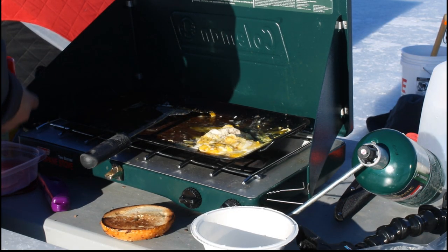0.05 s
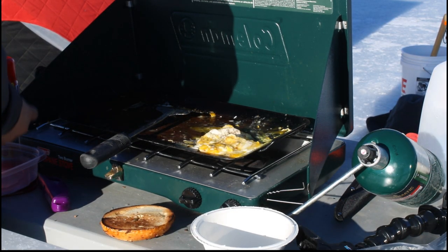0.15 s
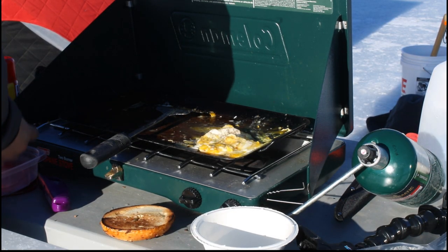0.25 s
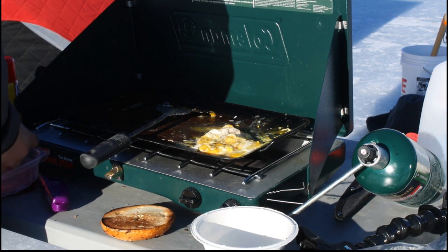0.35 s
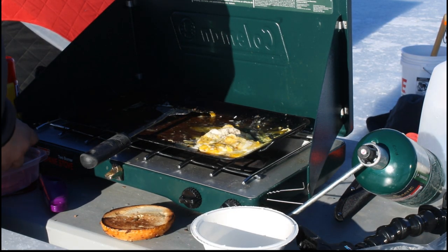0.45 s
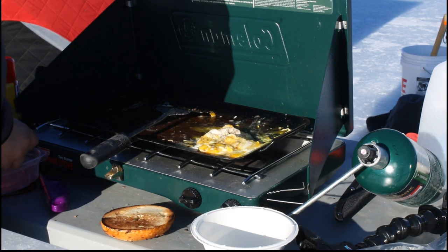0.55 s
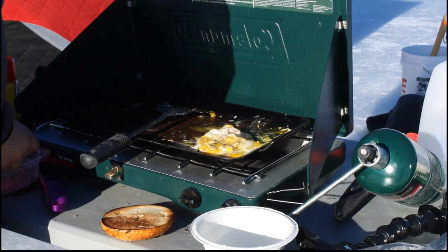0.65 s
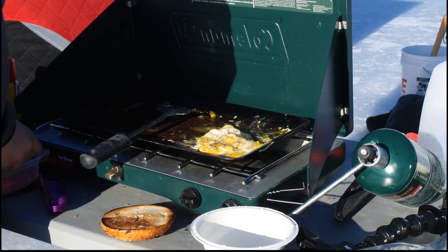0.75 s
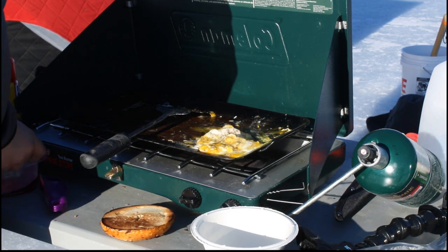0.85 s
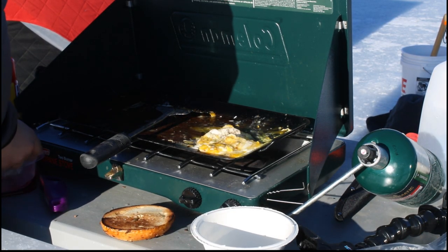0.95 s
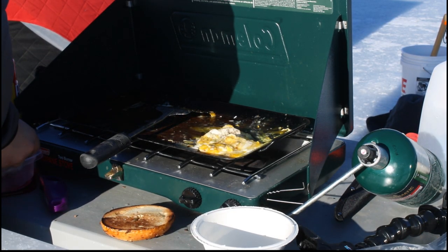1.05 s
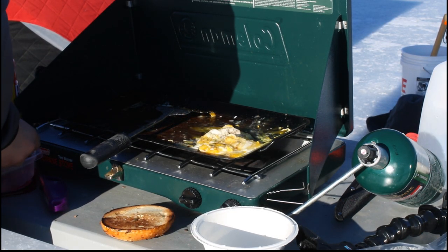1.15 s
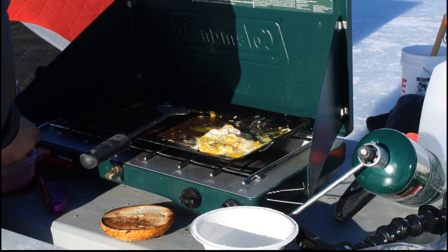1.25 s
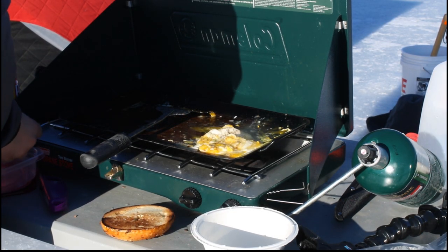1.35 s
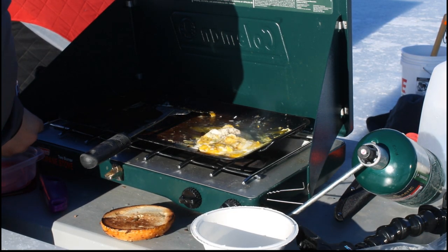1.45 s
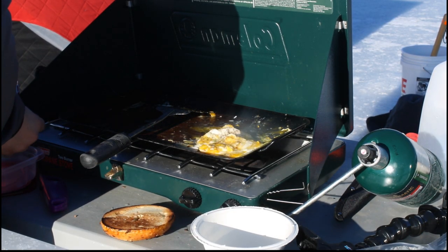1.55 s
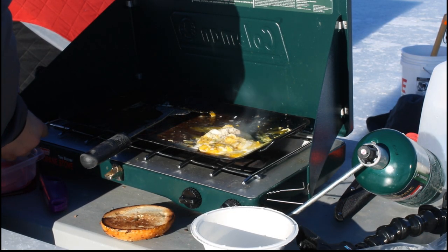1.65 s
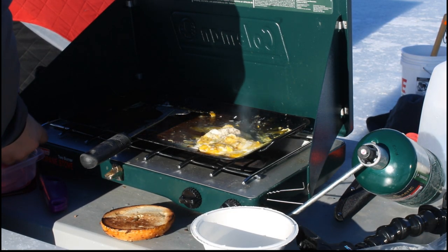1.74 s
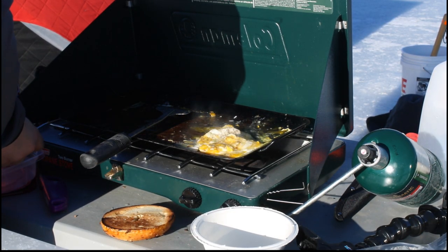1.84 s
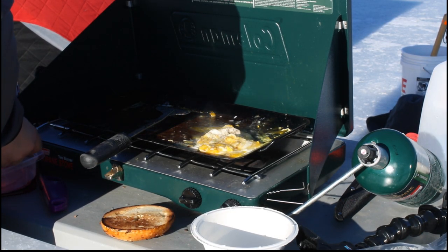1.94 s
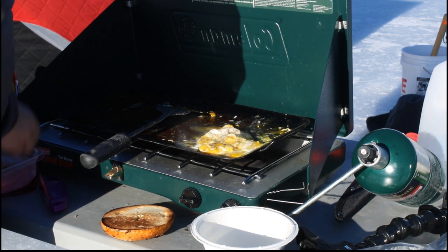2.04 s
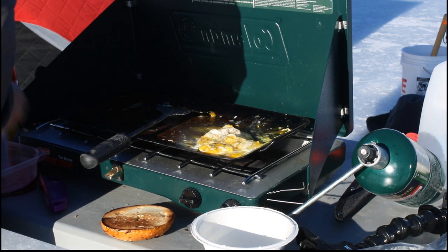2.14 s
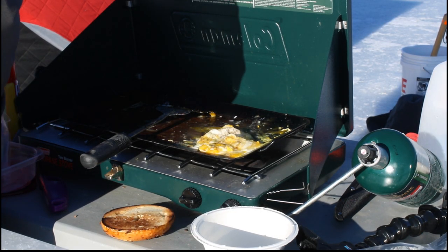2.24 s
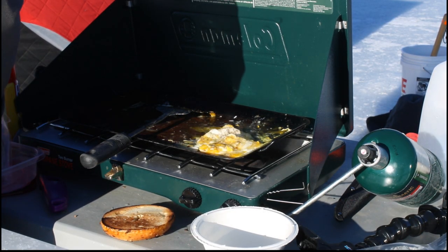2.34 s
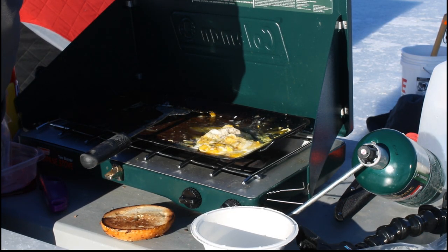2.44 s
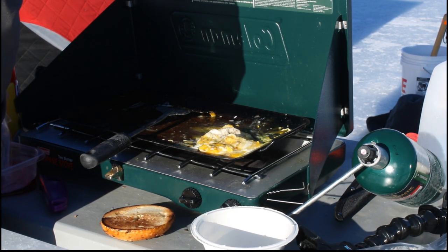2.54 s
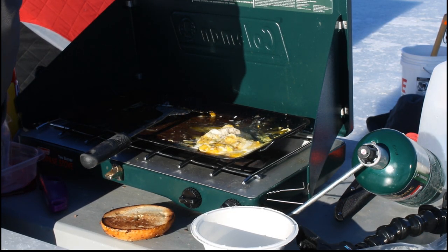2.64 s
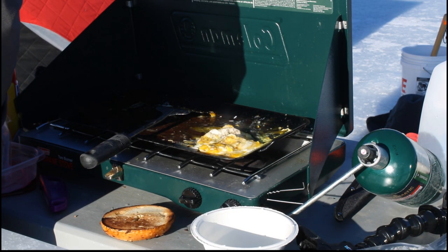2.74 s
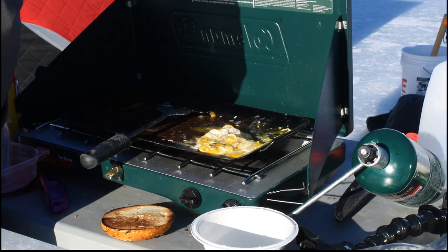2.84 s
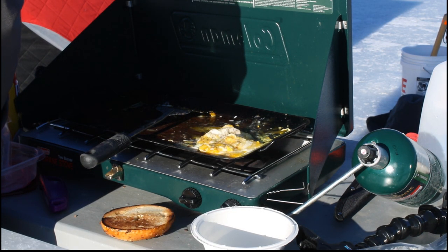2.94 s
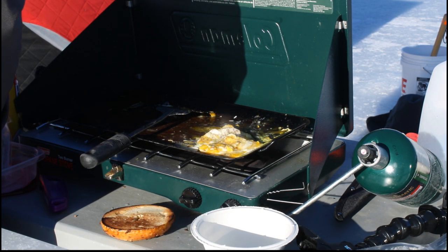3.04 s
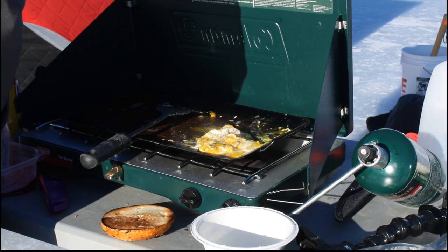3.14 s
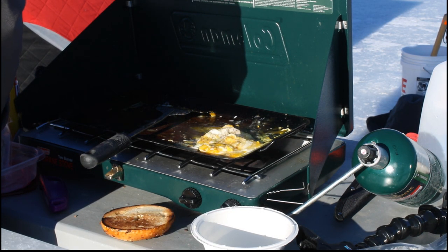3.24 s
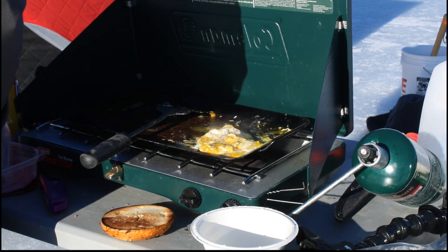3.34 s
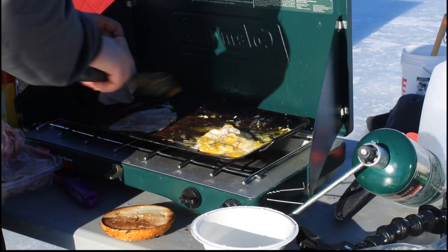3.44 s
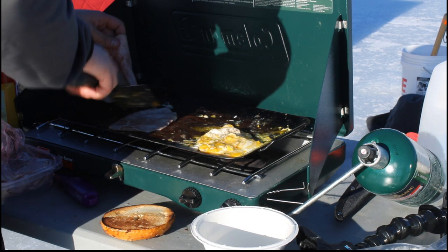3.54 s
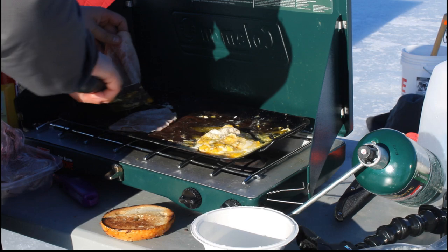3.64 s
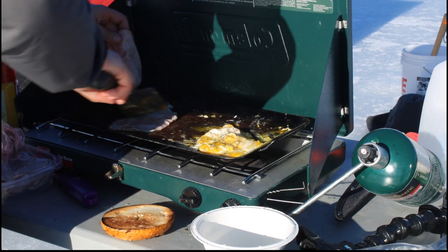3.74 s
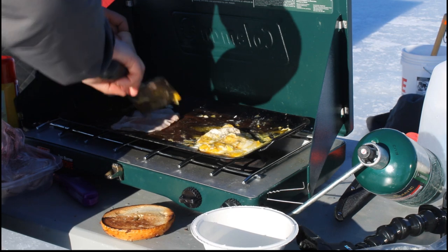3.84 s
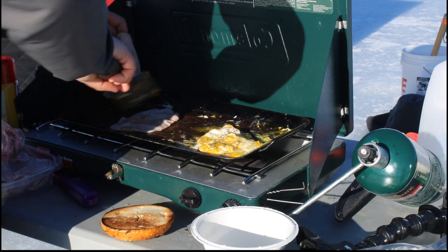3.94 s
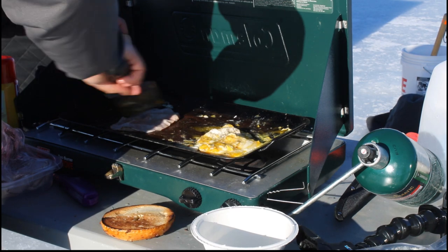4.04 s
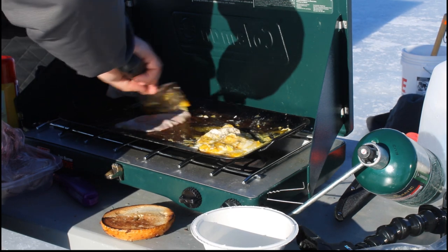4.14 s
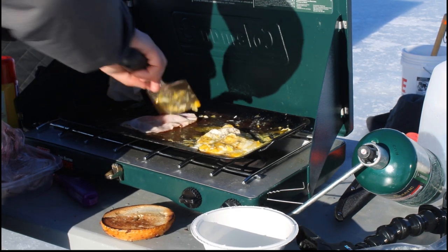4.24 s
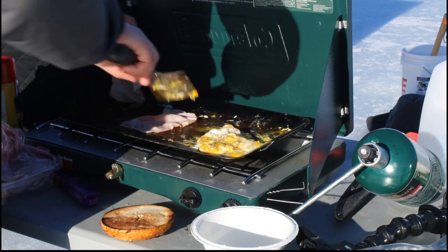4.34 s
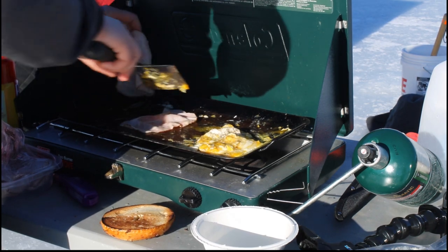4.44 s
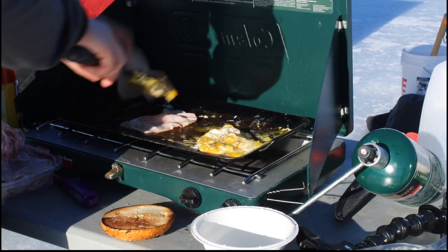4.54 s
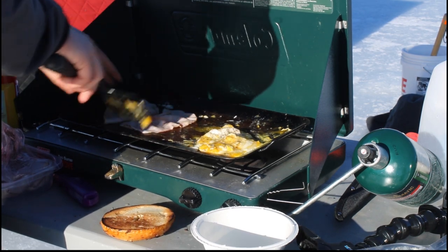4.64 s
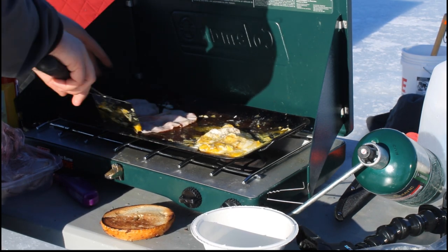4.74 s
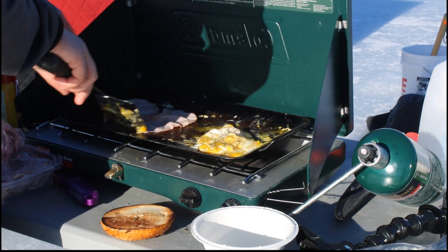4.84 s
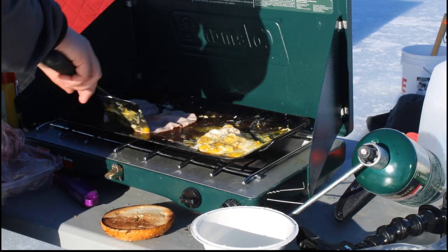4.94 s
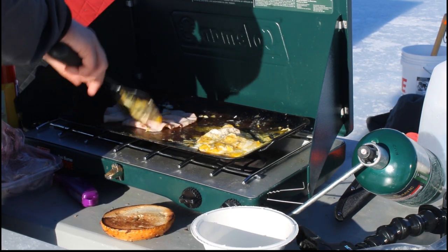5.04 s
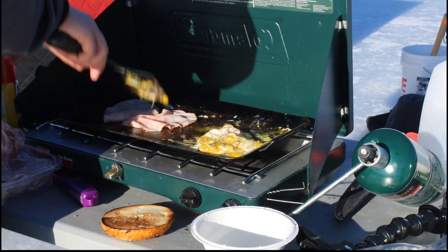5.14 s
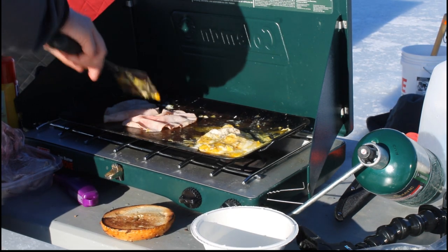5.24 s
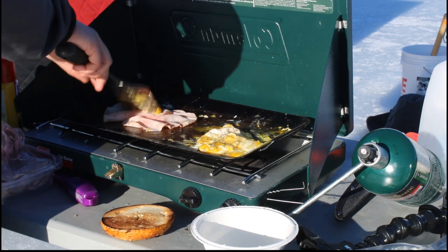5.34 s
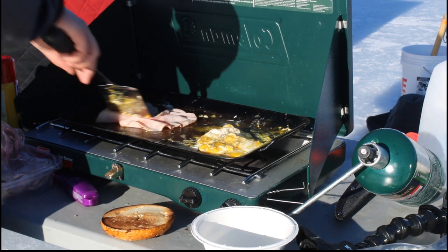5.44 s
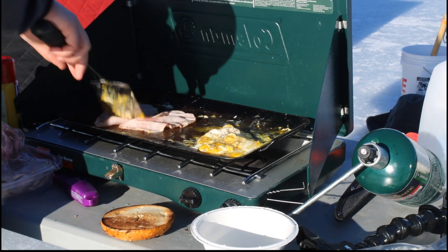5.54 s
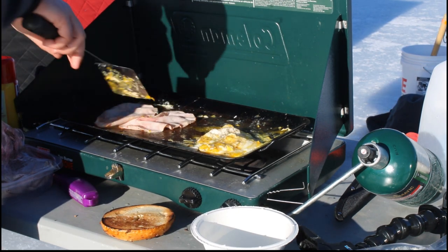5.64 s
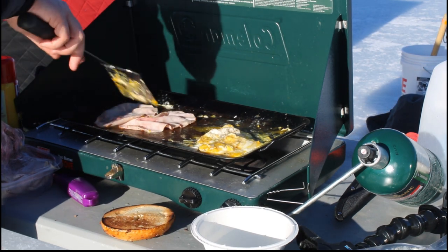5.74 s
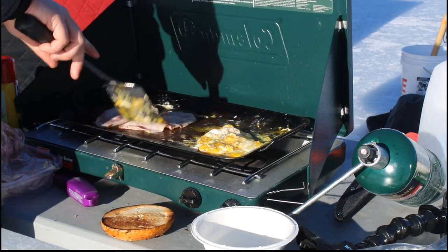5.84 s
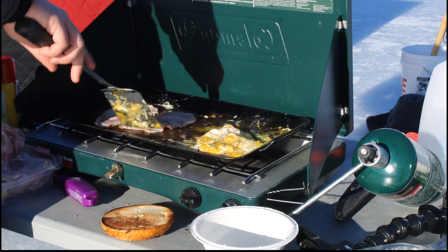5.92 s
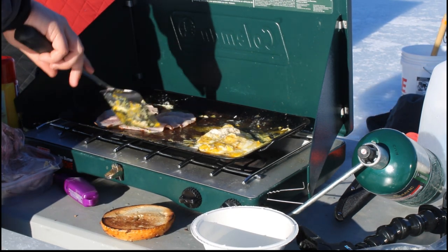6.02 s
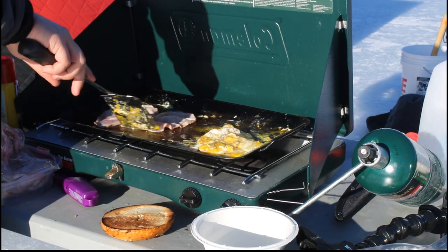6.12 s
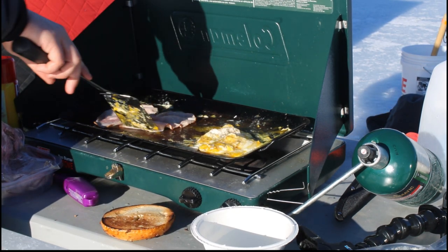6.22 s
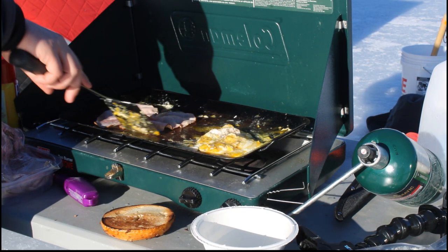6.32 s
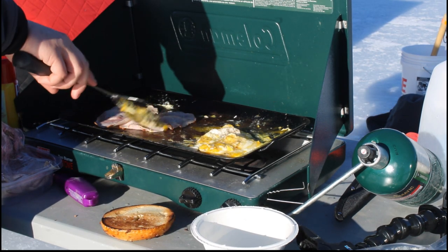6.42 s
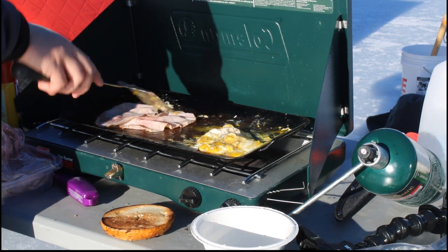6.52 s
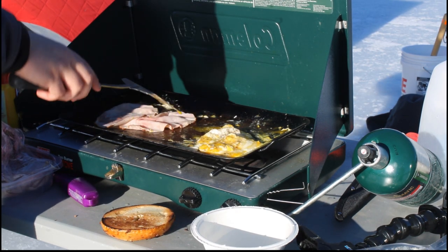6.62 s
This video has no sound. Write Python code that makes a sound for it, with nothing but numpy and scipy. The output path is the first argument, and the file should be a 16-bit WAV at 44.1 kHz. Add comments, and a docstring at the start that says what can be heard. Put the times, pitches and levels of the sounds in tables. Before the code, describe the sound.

Gas burner hiss and whistle with sparse egg crackle, then the flame drops, ham sizzles denser, a spatula knocks and scrapes, wind buffets the microphone.

```python
"""Egg and ham fry on a camp stove griddle, outdoors and close to one microphone: filtered noise and popping bubbles
fizz, drops of fat spit, and the sizzle grows once the ham is laid on and pressed.
The gas burner under it hisses, whistles and rumbles as shaped noise, until it is turned down halfway.
Gusts buffet the microphone in short low bursts that overload it and make its limiter duck.
Damped modes make dry knocks and the hard edge of two overloading wind thumps; a steel spatula scrapes and rings."""
import sys
import numpy as np
from scipy import signal
from scipy.fft import rfft, irfft, next_fast_len
from scipy.io import wavfile
from scipy.ndimage import uniform_filter1d, map_coordinates

SR = 44100
rng = np.random.default_rng(int(sys.argv[2]) if len(sys.argv) > 2 else 0)


def store_wav(level_fs):
    """Save 16-bit WAV to argv[1]."""
    pcm = np.round(np.clip(np.atleast_2d(level_fs), -1, 1) * 32767)
    wavfile.write(sys.argv[1], SR, pcm.T.astype(np.int16))


N = 294588

# Resonances of the burner tube: (frequency [Hz], width [Hz], level [dB])
TUBE_MODES = [(600, 42, 1), (884, 42, 4.5), (1282, 105, 6.5), (1855, 39, 0), (2820, 310, -9),
              (3864, 224, 1), (4500, 360, -1.5), (5740, 520, -4), (6870, 330, -7), (8100, 660, -11),
              (10780, 540, -11), (13800, 370, -9)]
# Spectrum of the flame's rumble: (frequency [Hz], density [dB per Hz])
FLAME_SPECTRUM = [(25, -3.5), (90, 2.5), (200, -7.5), (600, -15), (760, -23.5), (1400, -68)]
# The jet's breathy whistles at full gas: (time [s], low whistle [dB], middle whistle [dB])
WHISTLE_LEVELS = [(0, -45, -53), (.76, -49, -48), (.84, -52, -44.5), (1.25, -52, -39.5), (1.5, -46, -46.5),
                  (2.52, -44.5, -45.5), (2.9, -50, -54), (3.301, -43.5, -45)]
# Resonances that make the low, middle and top whistle: (frequency [Hz], width [Hz])
WHISTLE_MODES = [(4930, 110), (5240, 65), (8300, 220)]
# The gas runs evenly, then is turned down at GAS_DOWN_S
GAS_DB, GAS_LOW_DB, GAS_DOWN_S, GAS_FADE_DB_PER_S = -0.5, -10.5, 3.39, 300

# Spectrum of the light breeze on the microphone: (frequency [Hz], density [dB per Hz])
BREEZE_SPECTRUM = [(20, -4), (65, 2), (130, -5), (250, -7), (650, -30), (1200, -34), (4000, -68)]
# Gusts on the microphone: (time of the crest [s], rms level [dB], build time [s])
GUSTS = [(.158, -6, .014), (.225, -14, 0.045), (.622, -15, 0.021), (2.63, -22.5, 0.037),
         (2.715, -16.5, 0.025), (3.467, -15.5, 0.016), (3.508, -15, 0.024), (3.61, -17.5, 0.011),
         (3.645, -21, 0.017), (3.695, -19, 0.016), (3.777, -25, 0.023), (4.015, -14.5, 0.044),
         (4.27, -31.5, 0.36), (4.381, -16.5, 0.011), (4.419, -7.5, 0.011), (4.453, 1.5, 0.018),
         (5.175, -14.5, 0.014), (5.222, -20, 0.021), (5.39, -22.5, 0.02), (5.512, -14.5, 0.01),
         (5.595, -15.5, 0.039), (5.737, -14, 0.013), (5.79, -14, 0.012), (5.858, -16.5, 0.011),
         (6.037, -14, .024), (6.11, -15.5, 0.023), (6.263, -13.5, 0.013), (6.405, -17, 0.023),
         (6.65, -22, 0.055)]
GUST_DIE_RATIO = 1.22  # a gust dies away more slowly than it builds
# Spectrum of a gust: (multiple of the eddy rate [ratio], density [dB per Hz])
EDDY_SPECTRUM = [(.1, -7), (.3, -1), (.7, 3), (1.3, -1), (2.1, -9), (3.5, -23.5), (6, -36.5), (14, -71)]
# The strongest eddies thump the diaphragm: (time [s], peak level [dB], frequency [Hz])
THUMPS = [(.0605, -5.5, 158), (0.1474, -2, 426), (0.1584, -2, 190), (0.229, 5, 248), (.605, 0.5, 200),
          (0.6115, -7, 215.3), (2.618, -7, 98.5), (2.684, -3.5, 186.7), (3.5114, -6.5, 400),
          (3.5221, 1, 395), (4.392, -10, 440), (4.3979, -3, 239), (4.4151, -2, 300), (4.433, -5, 454),
          (5.1785, -10, 140), (5.2111, -11.5, 285), (5.606, -5.5, 183), (5.748, -5.5, 350),
          (5.787, -5.5, 350), (6.106, -6, 332), (6.3969, -5, 375), (6.4273, -11.5, 188), (6.488, -6.5, 308)]

# Flare-ups as moisture meets hot fat: (time of the crest [s], level [dB], rise [s], fall [s])
FLARES = [(0.019, -36.5, 0.044, 0.06), (0.428, -41.5, 0.24, 0.13), (.9, -44.5, 0.13, 0.25),
          (1.66, -40, .02, 0.07), (2.01, -37, 0.049, 0.16), (3.479, -40, 0.065, 0.15),
          (3.69, -37.5, 0.016, 0.022), (4.059, -34.5, 0.012, 0.027), (4.3, -37.5, 0.1, 0.36),
          (4.63, -34, 0.015, 0.11), (4.98, -29, 0.25, 0.31), (5.59, -28.5, 0.073, 0.092),
          (5.73, -32, 0.061, 0.051), (6.06, -35.5, 0.15, 0.11), (6.5, -33, 1, 1)]
SIMMER_DB = -48  # the steady simmer under the flare-ups
# Colour of the egg's sizzle: (frequency [Hz], density [dB per Hz])
EGG_SPECTRUM = [(500, -5), (1600, 2), (2900, 1.5), (5200, -8), (6800, -2), (8300, -12), (10500, -14),
                (15000, -50)]
# Colour of the fresh ham's sizzle: (frequency [Hz], density [dB per Hz])
FRESH_HAM_SPECTRUM = [(400, -23), (1500, -6.5), (3500, -9), (5300, -8), (6000, -6.5), (7900, 1.5),
                      (9500, -7.5), (12000, -16.5), (15000, -29)]
# Colour of the pressed ham's sizzle: (frequency [Hz], density [dB per Hz])
PRESSED_HAM_SPECTRUM = [(400, -51), (1500, -15.5), (3300, -17.5), (5200, -5), (6800, -1), (8200, -5.5),
                        (9500, -9.5), (12000, -24), (15000, -38)]

# The loudest bursting drops of fat: (time [s], peak level [dB])
LOUD_SPITS = [(0.0468, -14.5), (0.0672, -14), (0.1027, -14.5), (0.1268, -12.5), (0.4309, -16),
              (0.4700, -16), (0.597, -14), (0.8599, -16), (0.9368, -17), (1.0375, -15), (1.177, -17.5),
              (1.6384, -16), (1.6892, -21.5), (1.7599, -12), (1.8682, -14.5), (1.9022, -22), (1.935, -9),
              (1.968, -18), (2.0143, -14.5), (2.1101, -16), (2.9938, -19), (4.2702, -16.5), (4.6079, -13.5),
              (5.4276, -20.5), (6.6144, -11)]
# Colour of a bursting drop, before its own pitch shift: (frequency [Hz], density [dB per Hz])
SPIT_SPECTRUM = [(600, -3.5), (1600, -3), (3300, -3), (5800, 1.5), (8000, 7.5), (10500, -9), (15000, -28)]
SMALL_SPIT_DB, SMALL_SPIT_SPREAD_DB = -24, 2.3  # mean and spread of the smaller drops' peaks

# Dry knocks, and the hard edge of overloading wind thumps (at 0.227 and 3.519 s):
# (time [s], peak level [dB], pitch [ratio], upper edge [Hz])
KNOCKS_AND_THUMP_EDGES = [(0.227, -10.5, 0.82, 2800), (3.431, -15, 0.99, 3200), (3.519, -16, 1.24, 2900),
                          (3.674, -6, 1.02, 3840), (4.952, -15, 0.84, 1490), (5.073, 4, 0.88, 3820),
                          (5.1856, 1.5, 0.99, 2210), (5.295, -1.5, 0.98, 2900), (5.315, -14.5, 1, 1270)]
# Modes of these short sounds at pitch ratio 1: (frequency [Hz], level [dB], t60 [s])
SHORT_MODES = [(530, -5.5, 0.0086), (873, -0.5, 0.0086), (1058, -13.5, 0.023), (1950, -5, 0.0061),
               (2950, -13.5, 0.0084)]

# Strokes of the spatula: (time [s], rms level [dB], length [s], pressure [0-1])
STROKES = [(3.968, -22.5, 0.015, 0), (3.984, -41, 0.083, 0.08), (6.042, -25, 0.016, 0.87),
           (6.066, -32, 0.038, 0.84), (6.288, -26, 0.0095, 1)]
# Modes of the unpressed steel blade: (frequency [Hz], level [dB], t60 [s])
BLADE_MODES = [(1350, -9, 0.64), (1593, 0, 0.11), (1720, 2.5, 0.14), (1936, -5, 0.29), (2340, 5, 0.035),
               (2460, 3, .05), (2655, -1, 0.13), (3390, -11, 0.22), (3800, 4, 0.071), (4120, -8, 0.076),
               (4440, -15, 0.19), (4830, 5.5, 0.075), (6830, -3, 0.035), (8420, 10.5, 0.026)]
# Noise of steel rasping on the griddle: (frequency [Hz], density [dB per Hz])
RASP_SPECTRUM = [(600, -3), (2400, -5), (5000, -4), (8300, 0.5), (10000, -12.5), (15000, -36)]

TOP_HZ = 15400  # band limit of the microphone's signal


def amp(db):
    """Decibels to gain."""
    return 10 ** (np.asarray(db) / 20)


def unit(x):
    """Scale to rms 1."""
    return x / np.sqrt(np.mean(x ** 2) + 1e-20)


def curve(rows):
    """(time [s], value) rows as one value per sample."""
    return np.interp(np.arange(N) / SR, *np.transpose(rows))


def wobble(rate):
    """A smooth random curve, rate knots a second."""
    knots = rng.standard_normal(int(N * rate / SR) + 4)
    return map_coordinates(knots, [np.arange(N) * rate / SR])


def swell(t, rise, fall, shape):
    """An envelope that rises to 1 at t = 0 and falls again; a low shape makes the crest pointed."""
    return np.exp(-np.abs(t / np.where(t < 0, rise, fall)) ** shape)


def filtered(x, response):
    """x times a response of frequency, with padding so that the end does not wrap round."""
    m = next_fast_len(len(x) + 8192)
    return irfft(rfft(x, m) * response(np.fft.rfftfreq(m, 1 / SR)), m)[:len(x)]


def coloured(x, points, scale=1):
    """x with a (frequency [Hz], level [dB]) spectrum whose frequencies are multiplied by scale."""
    f, db = np.transpose(points)
    return filtered(x, lambda hz: amp(np.interp(np.log(hz / scale + 1e-6), np.log(f), db)))


def resonant(x, modes):
    """x through parallel (frequency [Hz], width [Hz], level [dB]) resonances of alternating sign."""
    def response(f):
        total = 0
        for k, (centre, width, db) in enumerate(modes):
            damping = 1j * f * width
            total = total + (-1) ** k * amp(db) * damping / (centre * centre - f * f + damping)
        return total
    return filtered(x, response)


def ring(modes, ratio, scatter_db):
    """Damped modes, struck at new strengths each time."""
    t = np.arange(SR // 4) / SR
    total = np.zeros(len(t))
    for hz, db, t60 in modes:
        decay = amp(db + scatter_db * rng.normal() - 60 * t / t60)
        total += decay * np.sin(2 * np.pi * hz * ratio * t)
    return total


def shields(x, t60):
    """The dense rattle of a sound between the stove's steel lid and wind shields: decaying noise."""
    t = np.arange(len(x)) / SR
    tail = rng.standard_normal(len(x)) * amp(-60 * t / t60)
    return signal.fftconvolve(x, tail / np.linalg.norm(tail))[:len(x)]


def add(track, s, sound):
    """Mix a sound into the track at time s."""
    start = round(s * SR)
    sound = sound[max(-start, 0):]
    part = track[max(start, 0):][:len(sound)]
    part += sound[:len(part)]


def jet_noise():
    """The gas jet's turbulence as coloured noise."""
    return coloured(rng.standard_normal(N), [(8500, 5.5), (11000, -5), (15000, -32)])


def whistles(waver=0.012, unsteady_db=2.5, top_db=-6):
    """Narrow resonances of the jet whistle; their pitch wavers, and the top one follows the middle one."""
    # reading the tone at an uneven speed bends its pitch
    wavering = np.arange(N) + np.cumsum(waver * wobble(9))
    times, low, middle = np.transpose(WHISTLE_LEVELS)
    out = np.zeros(N)
    for (hz, width), db in zip(WHISTLE_MODES, [low, middle, middle + top_db]):
        breath = resonant(jet_noise(), [(hz, width, 0)])
        tone = unit(map_coordinates(breath, [wavering], mode="mirror"))
        out += amp(curve(np.c_[times, db]) + unsteady_db * wobble(10)) * tone
    return out


def burner(hiss_db=-42.0, flame_db=-30.0, flutter_db=-0.5):
    """The gas jet hisses and whistles through its tube and the flame rumbles above; levels before gas."""
    hiss = amp(hiss_db) * unit(resonant(jet_noise(), TUBE_MODES))
    rumble = unit(coloured(rng.standard_normal(N), FLAME_SPECTRUM))
    flame = amp(flame_db + flutter_db * wobble(25.64)) * rumble
    turned_s = np.maximum(np.arange(N) / SR - GAS_DOWN_S, 0)
    gas_db = np.maximum(GAS_DB - GAS_FADE_DB_PER_S * turned_s, GAS_LOW_DB)
    return amp(gas_db) * (hiss + whistles() + flame)


def wind(breeze_db=-35, lumps_db=3, gust_db=0, shape=1.87, eddy_hz=280, rise=0.13, uneven_db=4.5):
    """A breeze rumbles throughout; gusts shed eddies across the microphone, the strongest as thumps."""
    breeze = unit(coloured(rng.standard_normal(N), BREEZE_SPECTRUM))
    out = amp(breeze_db + lumps_db * wobble(11)) * breeze
    t = np.arange(-SR // 3, SR // 3) / SR
    eddy_size = amp(uneven_db * wobble(110))
    for s, db, build in GUSTS:
        strength = swell(t, build, GUST_DIE_RATIO * build, shape)
        sizes = np.roll(eddy_size, -round(s * SR))[:len(t)]
        eddies = strength * sizes * rng.standard_normal(len(t))
        # a stronger gust sheds its eddies faster
        burst = coloured(eddies, EDDY_SPECTRUM, eddy_hz * amp(db) ** rise)
        level = amp(db + gust_db) * np.linalg.norm(strength) / np.linalg.norm(burst)
        add(out, s + t[0], level * burst)
    for s, db, hz in THUMPS:
        # a single push and pull of the diaphragm
        phase = 2 * np.pi * hz * t
        push = phase / (1 + (phase / 2.39) ** 2) ** 3
        add(out, s + t[0], amp(db) * push / push.max())
    return out


def frying(shape=1.3):
    """Strength of the sizzle: a steady simmer plus flare-ups that swell and die down, summed as power."""
    t = np.arange(N) / SR
    power = amp(SIMMER_DB) ** 2
    for s, db, rise, fall in FLARES:
        power = power + (amp(db) * swell(t - s, rise, fall, shape)) ** 2
    return np.sqrt(power)


def crackle(rate, spread_db, fizz, life):
    """Tiny bubbles burst at random: each is a puff of noise, most small, a few large, over an even fizz."""
    size = amp(spread_db * np.minimum(rng.exponential(size=N), 4))
    bursts = (rng.random(N) < rate / SR) * size ** 2
    power = np.abs(signal.lfilter([1], [1, -np.exp(-1 / (life * SR))], bursts))
    return unit(np.sqrt(power / power.mean() + abs(fizz)) * rng.standard_normal(N))


def bubbling(x, patchy_db):
    """Clumps of bubbles favour their own pitches for a moment, which mottles the hiss."""
    z = signal.stft(x, nperseg=256)[2]
    field = uniform_filter1d(rng.standard_normal(z.shape), size=3, axis=0)  # smooth over pitch
    field = uniform_filter1d(field, size=7, axis=1)  # smooth over time
    return signal.istft(z * amp(patchy_db * unit(field)), nperseg=256)[1][:N]


def spatter(centre_hz=6000, pitch_spread=0.327, cycles=3, spread_db=4.0, clumping=0.7, count=4500):
    """Wet crackle: tiny steam bubbles pop in clumps, each ringing for a few cycles at its own pitch."""
    chance = np.cumsum(np.exp(clumping * wobble(30)))
    start = np.searchsorted(chance, rng.random(count) * chance[-1])
    hz = centre_hz * np.exp(pitch_spread * rng.standard_normal((count, 1)))
    size = amp(spread_db * np.minimum(rng.exponential(size=(count, 1)), 4))
    n = np.arange(SR // 250)  # a pop lasts 4 ms at most
    turns = hz * n / SR
    pops = size * np.sin(2 * np.pi * turns) * np.exp(-turns / cycles)
    track = np.bincount((start[:, None] + n).ravel(), pops.ravel(), N)[:N]
    return unit(coloured(track, FRESH_HAM_SPECTRUM))


def sizzle(strength, egg_db=0, fresh_db=1.07, pressed_db=4, spatter_db=-3, sputter_db=1):
    """The egg crackles sparsely; wet ham boils densely, and lower in pitch once it is pressed flat."""
    # shares of ham in the sizzle's power, and of pressed ham in the boil
    ham = curve([(3.38, 0.31), (3.44, 0.9)]).clip(0, 1)
    pressed = curve([(5.3, 0.038), (5.55, 0.68)]).clip(0, 1)
    bubbles = crackle(rate=200, spread_db=5.0, fizz=0.13, life=0.0028)
    egg = amp(egg_db) * unit(coloured(bubbles, EGG_SPECTRUM))
    boil = bubbling(crackle(rate=600, spread_db=2.5, fizz=0.99, life=0.00049), patchy_db=1.5)
    fresh = amp(fresh_db) * unit(coloured(boil, FRESH_HAM_SPECTRUM))
    flat = amp(pressed_db) * unit(coloured(boil, PRESSED_HAM_SPECTRUM))
    meat = (1 - pressed) * fresh + pressed * flat + amp(spatter_db) * spatter()
    mix = np.sqrt(1 - ham) * egg + np.sqrt(ham) * meat
    return strength * amp(sputter_db * wobble(40)) * mix


def spits(strength, level_db=0.0, life=0.0021, shield_db=-9, shield_t60=0.096,
          pitch=0.96, pitch_scatter=0.07, count=24):
    """Larger drops swell and burst within a few milliseconds, each at a pitch of its own."""
    out, t = np.zeros(N), np.arange(SR // 12) / SR
    # until the gas is turned down, small drops fall likeliest where the sizzle is strong
    chance = np.cumsum(strength[:round(GAS_DOWN_S * SR)] ** 2)
    times = np.searchsorted(chance, rng.random(count) * chance[-1]) / SR
    small = [(s, SMALL_SPIT_DB + SMALL_SPIT_SPREAD_DB * rng.normal()) for s in times]
    for s, db in list(LOUD_SPITS) + small:
        burst = rng.standard_normal(len(t)) * t * np.exp(-2 * t / life)
        tick = coloured(burst, SPIT_SPECTRUM, pitch * np.exp(pitch_scatter * rng.normal()))
        tick = tick + amp(shield_db) * shields(tick, shield_t60)
        add(out, s, amp(db + level_db) * tick / np.abs(tick).max())
    return out


def knocks_and_thump_edges(shield_db=-17, shield_t60=0.1, low_hz=320):
    """Short damped modes make soft-edged knocks and the hard edge of wind thumps, with a faint dense tail."""
    out = np.zeros(N)
    low_cut = signal.butter(2, low_hz, "highpass", fs=SR, output="sos")
    for s, db, ratio, upper_hz in KNOCKS_AND_THUMP_EDGES:
        high_cut = signal.butter(5, upper_hz, fs=SR, output="sos")
        modes = ring(SHORT_MODES, ratio, scatter_db=1.0)
        dry_hit = signal.sosfilt(np.vstack([low_cut, high_cut]), modes)
        with_tail = dry_hit + amp(shield_db) * shields(dry_hit, shield_t60)
        add(out, s, amp(db) * with_tail / np.abs(dry_hit).max())
    return out


def spatula(grit_db=0, shield_db=-4, shield_t60=0.1, sag=0.062, damping=0.29):
    """The blade's edge catches and slips on the griddle; the slips rasp and ring the steel."""
    out, t = np.zeros(N), np.arange(SR // 4) / SR
    for s, db, length, pressure in STROKES:
        slips = rng.standard_normal(len(t)) * np.exp(-(t / length) ** 2)
        # pressed into the meat, the blade rings lower and shorter
        shorten = 1 + abs(damping * pressure)
        modes = [(hz, level, t60 / shorten) for hz, level, t60 in BLADE_MODES]
        blade = ring(modes, 1 - sag * pressure, scatter_db=1.5)
        steel = signal.fftconvolve(slips, blade)[:len(t)]
        rasp = unit(coloured(slips, RASP_SPECTRUM))
        grit = rasp + amp(shield_db) * shields(rasp, shield_t60)
        stroke = unit(steel) + amp(grit_db) * grit
        add(out, s, amp(db) * stroke / stroke[t < 2 * length].std())
    return out


def scene():
    """All sources at one microphone; one frying strength drives both the sizzle and the small drops."""
    strength = frying()
    food = sizzle(strength) + spits(strength)
    return (burner() + wind() + food + knocks_and_thump_edges() + spatula())[None]


def record(dry, bass_hz=28, ceiling_db=-1.0, attack_s=0.0013, recover_db_per_s=42):
    """The microphone sheds deep bass; its limiter ducks and recovers slowly; peaks round off at full scale."""
    heard = filtered(dry[0], lambda hz: 1j * hz / (bass_hz + 1j * hz))
    excess = np.maximum(20 * np.log10(np.abs(heard) + 1e-9) - ceiling_db, 0)
    # hold each excess, letting it fall at the recovery rate
    recovery = recover_db_per_s * np.arange(N) / SR
    held = np.maximum.accumulate(excess + recovery) - recovery
    keep = np.exp(-1 / (attack_s * SR))
    duck_db = signal.lfilter([1 - keep], [1, -keep], held)
    ducked = heard * amp(-duck_db)
    clipped = ducked / (1 + np.abs(ducked) ** 8) ** (1 / 8)
    return filtered(clipped, lambda hz: hz < TOP_HZ)[None]


dry = scene()
out = record(dry)
store_wav(out)
```